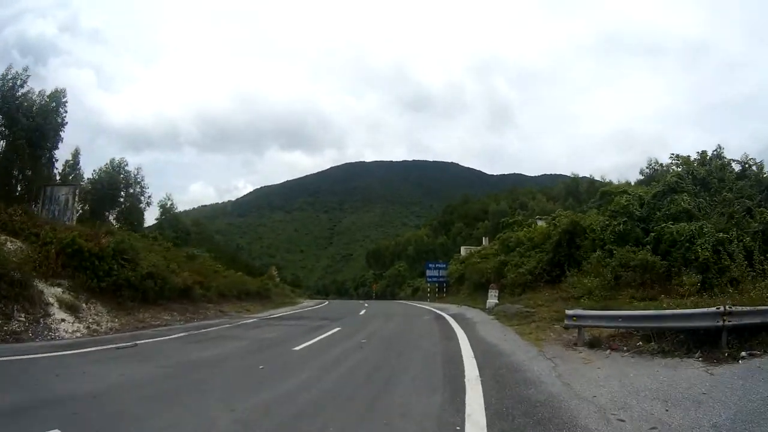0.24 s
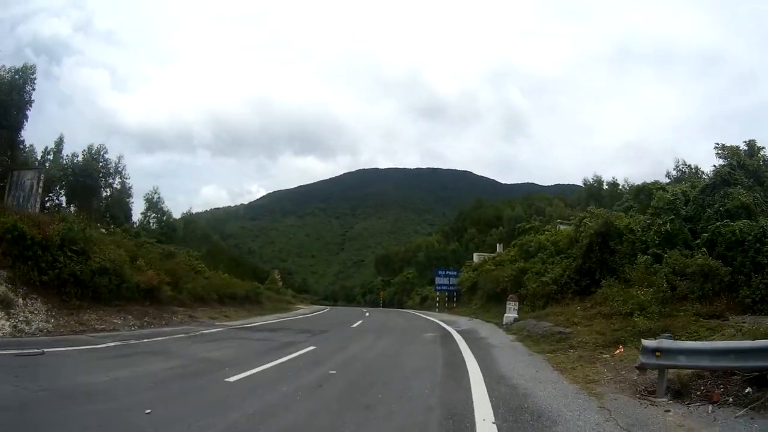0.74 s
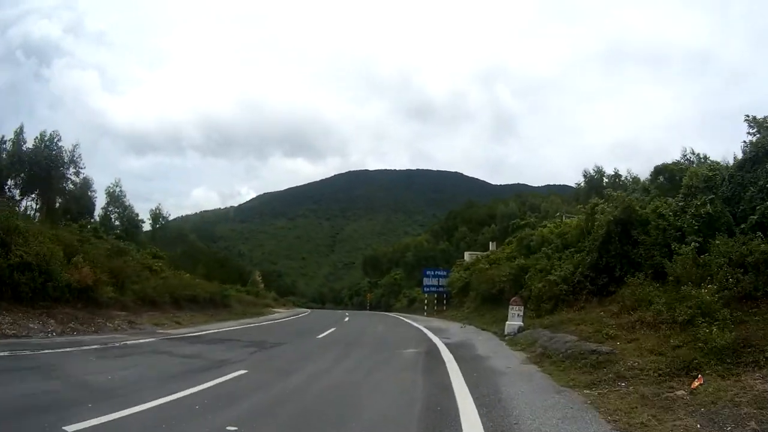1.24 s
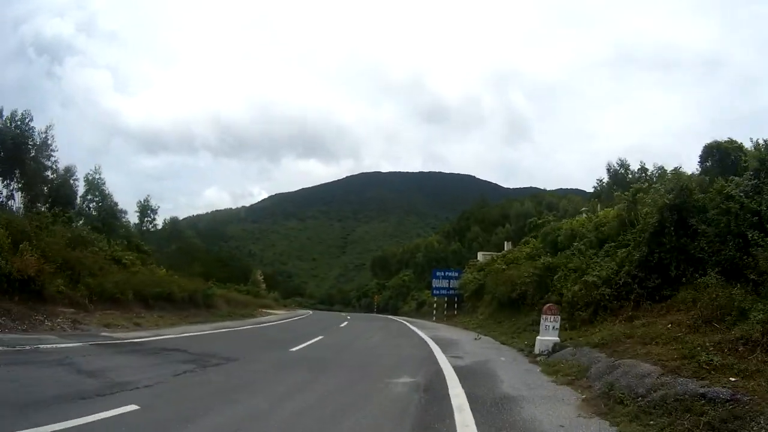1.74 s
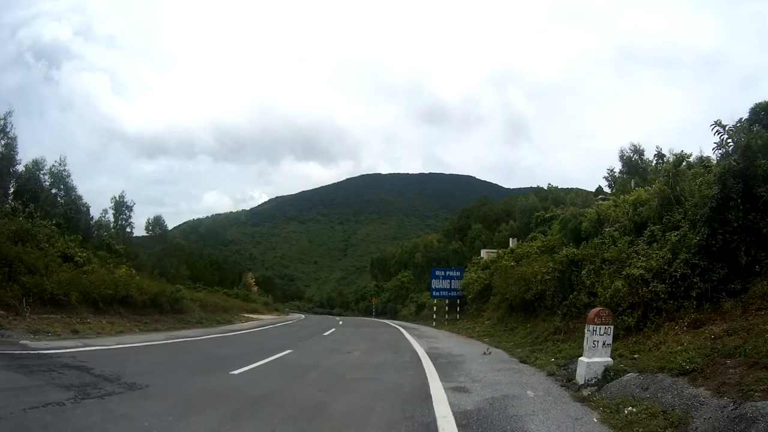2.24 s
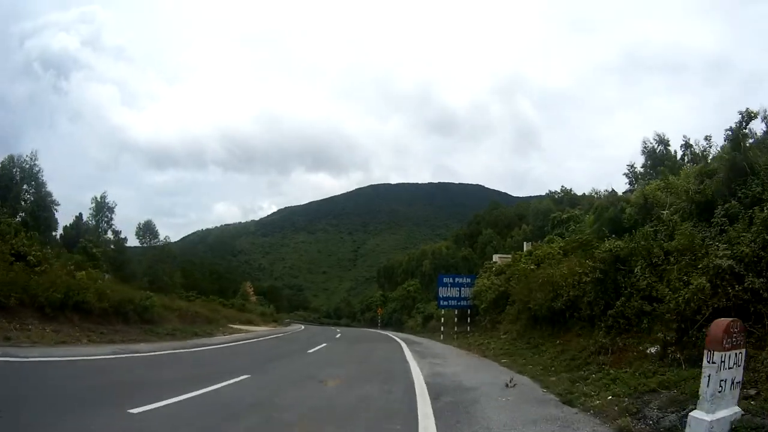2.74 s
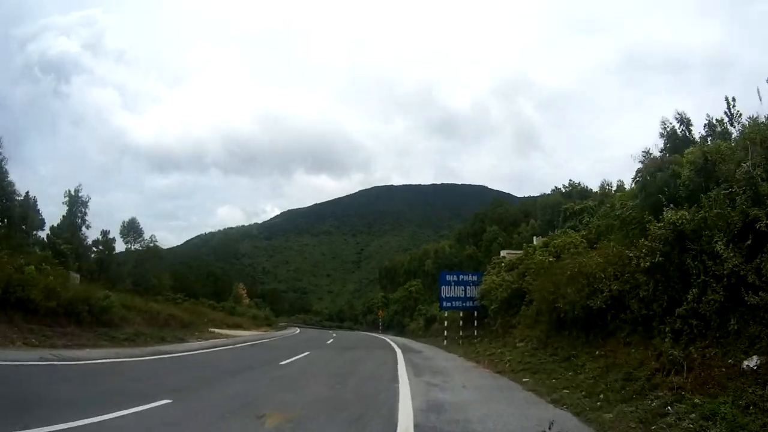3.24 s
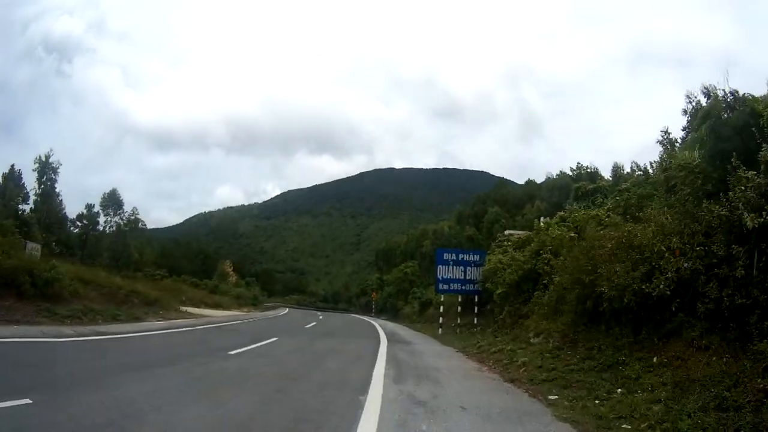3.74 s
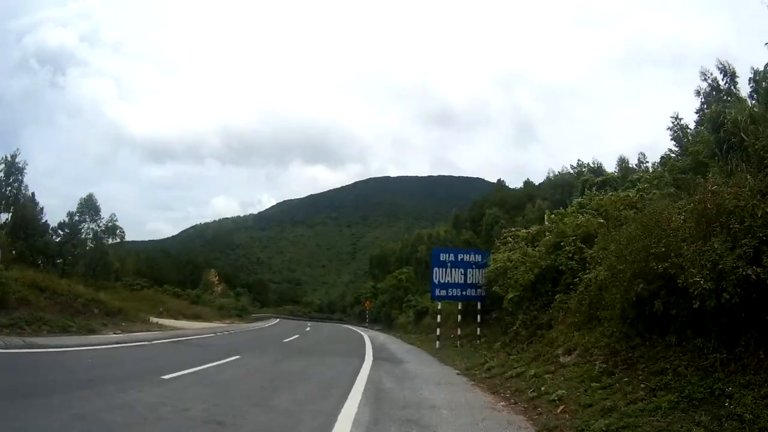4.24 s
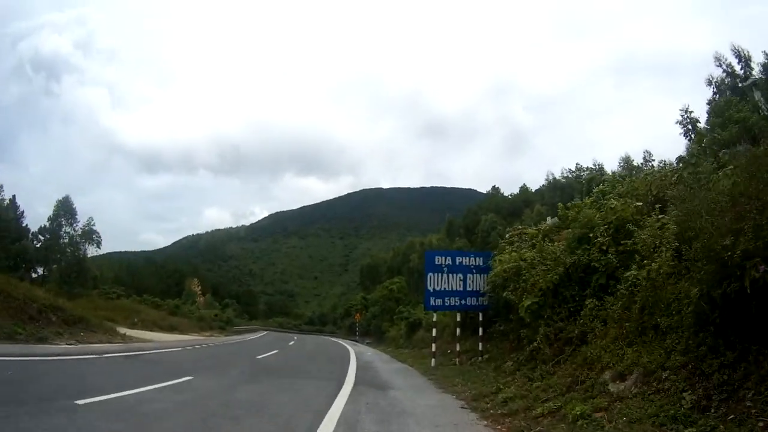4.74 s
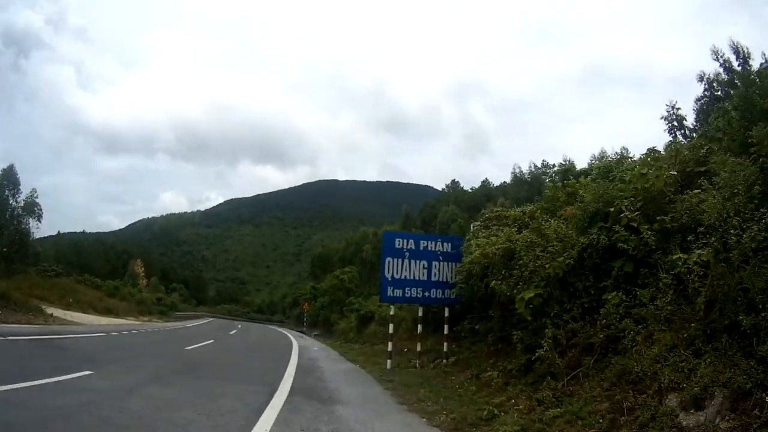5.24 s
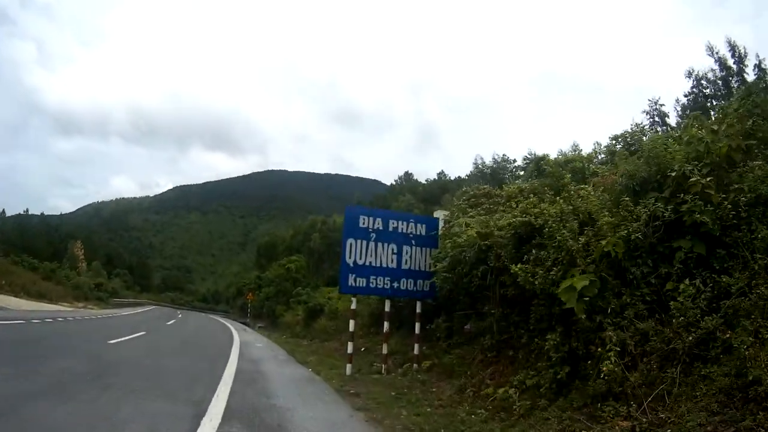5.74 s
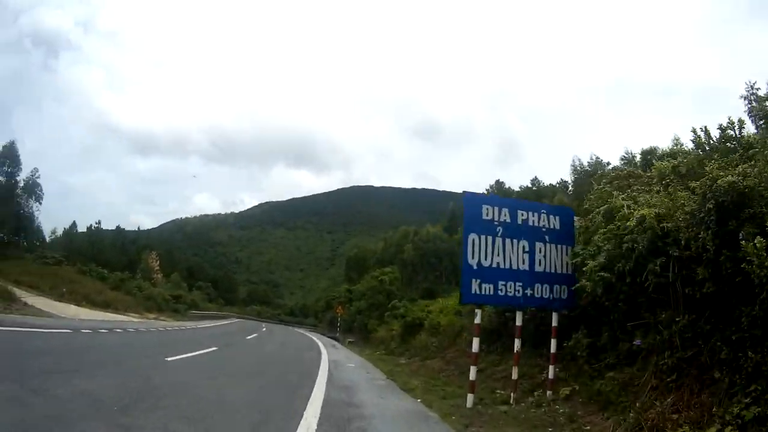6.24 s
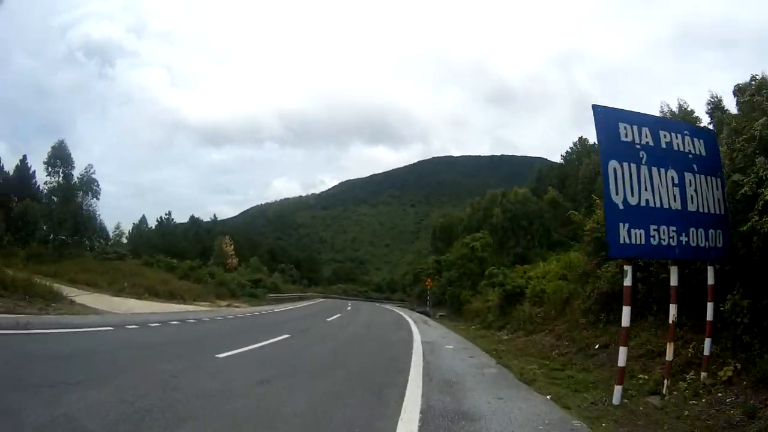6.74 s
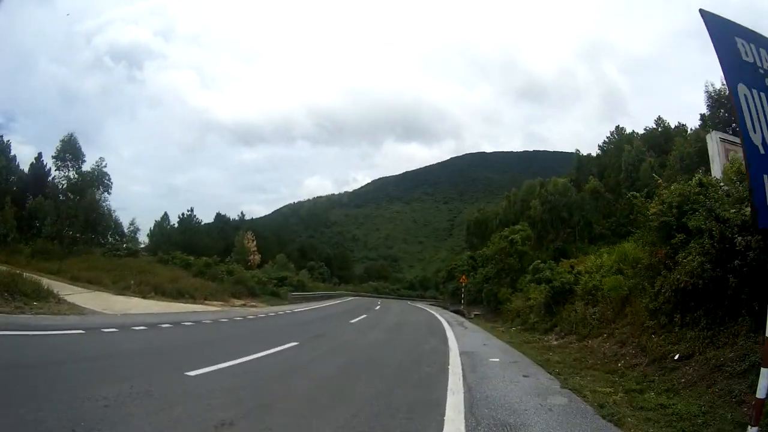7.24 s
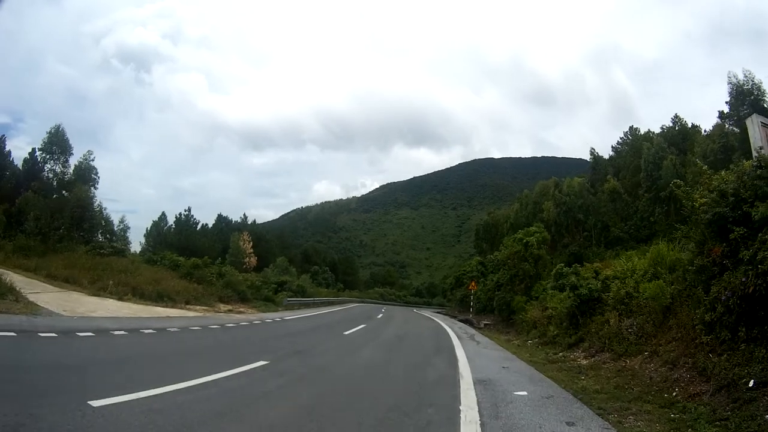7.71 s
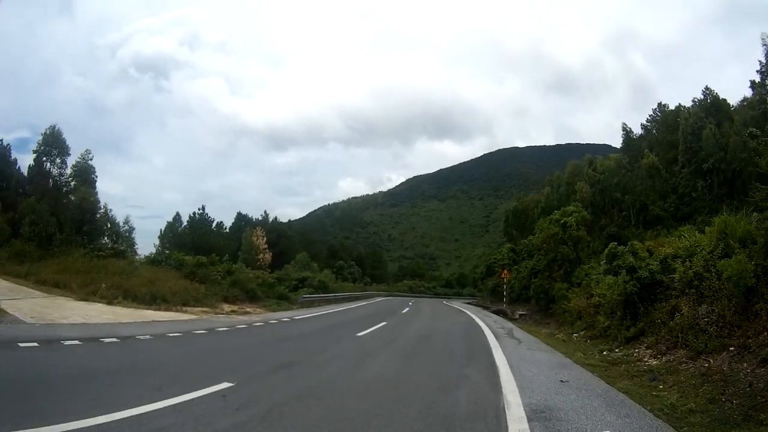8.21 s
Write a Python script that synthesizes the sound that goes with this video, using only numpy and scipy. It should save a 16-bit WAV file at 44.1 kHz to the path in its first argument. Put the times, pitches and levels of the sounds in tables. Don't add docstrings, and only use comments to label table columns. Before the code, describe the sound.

Heard from a muffled microphone mounted on a small motorcycle, a single-cylinder engine thuds rapidly with casing ring, gear whine and tyre roar. Low wind lumps press the housing. After about three seconds the throttle eases, firings slow and become uneven, a fitting tings faintly and a bird trills briefly. A sharp grit crack comes just before the engine picks up and pulls steadily on the open hill road.

```python
import sys
import numpy as np
from scipy import signal
from scipy.fft import rfft, irfft, next_fast_len
from scipy.io import wavfile
from scipy.ndimage import map_coordinates

SR = 44100
rng = np.random.default_rng(int(sys.argv[2]) if len(sys.argv) > 2 else 0)


def decibels_to_gain(level_db):
    exponent = np.asarray(level_db, float) / 20
    return 10 ** exponent


def generate_wav(signal):
    frames = np.transpose(np.atleast_2d(signal))
    scaled = np.clip(frames, -1, 1) * 32767
    pcm = np.round(scaled).astype(np.int16)
    wavfile.write(sys.argv[1], SR, pcm)


N = 373527


def unit(x):
    return x / np.sqrt(np.mean(x ** 2) + 1e-20)


def curves(rows):
    s, *cols = np.transpose(rows)
    return [np.interp(np.arange(N) / SR, s, c) for c in cols]


def swells(rows):
    t = np.arange(N) / SR
    return sum(db * np.exp(-((t - s) / width) ** 2) for s, db, width in rows)


def between(pair, opening):
    shut, cruising = pair
    return shut + (cruising - shut) * opening


def wobble(rate):
    knots = rng.standard_normal(int(N * rate / SR) + 4)
    return map_coordinates(knots, [np.arange(N) * rate / SR])


def filtered(x, response):
    m = next_fast_len(N + SR // 2)
    return irfft(rfft(x, m) * response(np.fft.rfftfreq(m, 1 / SR)), m)[:N]


def sloped(points):
    f, v = np.transpose(points)
    return lambda hz: decibels_to_gain(np.interp(np.log(hz + 1), np.log(f), v, left=-120, right=-120))


def modes(rows):
    def response(f):
        total = 0
        for k, (centre, width, db) in enumerate(rows):
            damping = 1j * f * width
            total = total + (-1) ** k * decibels_to_gain(db) * damping / (centre * centre - f * f + damping)
        return total
    return response


def noise(response, gate=1):
    return unit(filtered(gate * rng.standard_normal(N), response))


def bursts(at, size, hz, spread, shift, lead):
    index = np.round(at).astype(int)[:, None] + np.arange(-1500, 1500)
    t = (index - at[:, None]) / SR
    bell = np.exp(-((t - shift) / spread) ** 2)
    wave = size[:, None] * bell * np.cos(2 * np.pi * hz[:, None] * t + lead)
    keep = (index >= 0) & (index < N)
    return np.bincount(index[keep], wave[keep], N)


# t/s, firings per second
REVS = [(0.0, 21.219), (0.4, 20.679), (1.2, 20.49), (2.4, 19.851), (3.3, 18.828), (3.7, 15.848),
        (3.9, 17.096), (4.2, 15.759), (4.5, 15.967), (5.05, 14.484), (5.75, 14.025), (6.1, 14.472),
        (6.35, 14.279), (6.75, 18.391), (7.2, 20.573), (8.47, 20.643)]
FIRST = .189


def firing_rate():
    return curves(REVS)[0]


# t/s, opening (0 shut, 1 cruising)
THROTTLE = [(0, 0.9), (1.4, .9), (2.2, 1.05), (3.2, 1.16), (3.45, 0.5), (4.85, 0.45), (5.1, 0.52),
            (6.3, 0.039), (6.65, 0.58), (7.05, 1.04), (7.2, 1.12), (7.6, 1.06), (8.47, 1.14)]


def throttle():
    return curves(THROTTLE)[0]


# f/Hz, level/dB per Hz
HISS = [(800, -38), (2000, 2.5), (3200, 2.5), (5000, 1), (7000, -1.8), (10000, -1.8), (14000, -2.2),
        (16500, -8)]


def hiss():
    return decibels_to_gain(-72.5) * noise(sloped(HISS))


# t/s, level/dB
AIR = [(0, -37), (.3, -41), (.6, -38), (1.1, -40.5), (1.4, -37.5), (1.55, -42), (2, -41.5), (2.4, -41.5),
       (2.7, -40.5), (3, -41), (3.5, -44), (4.1, -50.5), (4.7, -46.5), (5.4, -62.5), (7, -56.5), (7.5, -50),
       (8, -51), (8.47, -45.5)]
# t/s, level/dB, half width/s
GUSTS = [
    (.3, 6.5, .15),
    (1.2, 1, 0.22),
    (2.45, 6, 0.33),
    (3.6, 9.5, 0.12),
    (4.05, 7.5, 0.17),
    (4.7, 7, 0.29),
    (5.8, -4, 0.75),
    (7.7, 3, 0.26),
]
# f/Hz, level/dB per Hz
BUFFET = [(15, -27), (32, -5.5), (55, 0), (85, -6.5), (160, -47)]
# f/Hz, level/dB per Hz
FLUTTER = [(40, -23), (90, 4), (200, -0.5), (300, -3), (450, -14.5), (900, -19)]


def wind():
    flutter_db = curves(AIR)[0]
    buffet_db = -56 + 0.19 * (flutter_db - flutter_db.mean()) + swells(GUSTS)
    buffet = noise(sloped(BUFFET), decibels_to_gain(1.2 * wobble(6.1)))
    flutter = noise(sloped(FLUTTER), decibels_to_gain(1.5 * wobble(25) + 1.8 * wobble(5)))
    return decibels_to_gain(buffet_db + 6.5) * buffet + decibels_to_gain(flutter_db + 1.0) * flutter


def bird():
    start_s, gap_s, notes = 4.9545, .0346, 13
    out, t = np.zeros(N + SR), np.arange(int(0.026 * SR)) / SR
    part = t / t[-1]
    luck = rng.standard_normal((notes, 2))
    for k in range(notes):
        shy = k < 2
        pitch_hz = 3410 - 130 * shy + 12 * luck[k, 0] - 340 * part ** 3
        envelope = np.sin(np.pi * part ** 1.7) ** 1.2
        note = envelope * np.sin(2 * np.pi * np.cumsum(pitch_hz) / SR)
        db = -67.5 - 7 * shy + 3.5 * (k / notes) ** 2 + .7 * luck[k, 1]
        out[round((start_s + k * gap_s) * SR):][:len(t)] += decibels_to_gain(db + 1.8) * note
    return out[:N]


# t/s, crack level/dB, ring f/Hz, push level/dB, push f/Hz
GRIT = [
    (.824, -47, 4500, -18.5, 600),
    (1.973, -47, 5100, -42, 900),
    (3.4395, -70, 3000, -19, 240),
    (3.853, -68, 2500, -25, 1150),
    (4.889, -64, 2600, -27, 900),
    (6.461, -33.5, 10800, -25, 600),
    (7.2625, -48, 10200, -55, 700),
    (7.831, -52, 6100, -45, 900),
]


def grit():
    out, t = np.zeros(N + SR), np.arange(2000) / SR
    for s, db, hz, push_db, push_hz in GRIT:
        crack = np.sin(2 * np.pi * hz * t) * decibels_to_gain(-60 * t / .004)
        crack += .33 * rng.standard_normal(len(t)) * decibels_to_gain(-60 * t / .005)
        crack *= 1 - np.exp(-t / .0004)
        push = np.sin(2 * np.pi * push_hz * t) * decibels_to_gain(push_db - 60 * t / .008)
        push *= 1 - np.exp(-t / .0003)
        out[round(s * SR):][:len(t)] += decibels_to_gain(db) * crack + push
    return out[:N]


# t/s, peak level/dB, f/Hz
TINGS = [(3.62, -74, 4700), (4.35, -72, 4700), (4.79, -70, 4680), (5.0, -71, 4750), (5.24, -73, 4680),
         (5.475, -70, 4620), (5.685, -71, 4680)]


def loose_fitting():
    out, t = np.zeros(N + SR), np.arange(2000) / SR
    for s, db, hz in TINGS:
        envelope = decibels_to_gain(db + 7.5 - 60 * t / .06) * (1 - np.exp(-t / .004))
        out[round(s * SR):][:len(t)] += envelope * np.sin(2 * np.pi * hz * t)
    return out[:N]


TEETH = [23, 32.6, 41]
# level/dB throttle shut, level/dB cruising
MESH_LEVEL = [(-65.5, -65), (-71, -56), (-85, -61.5)]
# t/s, level/dB, half width/s
PULLS = [
    (0, 19, 0.15),
    (7.3, 20, 0.75),
]
# t/s, level/dB, half width/s
CLIMB = [
    (2.6, 5, 1),
]


def gears(cycle):
    tones, opening = 0, throttle()
    for teeth, pair, load in zip(TEETH, MESH_LEVEL, (PULLS, CLIMB, CLIMB)):
        db = between(pair, opening) + swells(load)
        level = decibels_to_gain(db + 2.5 + 1.9 * wobble(12))
        tones = tones + level * np.sin(2 * np.pi * teeth * cycle + 1.15 * wobble(22))
    return tones


# f/Hz, width/Hz, level/dB
CASING = [(645.5, 55.5, -0.5), (828, 30, -3), (1106, 102, -3.5), (1305.4, 55, -2), (1637, 193, -13),
          (2427, 180, -26.5)]
# f/Hz, width/Hz, level/dB
FRAME = [(310, 80, -11), (465, 65, 0), (900, 80, -9)]
# f/Hz, width/Hz, level/dB
PANELS = [(3330, 150, -6), (3820, 190, 0), (4260, 160, -3), (5270, 220, -1), (5900, 500, -13)]
# f/Hz, level/dB per Hz
ROAR = [(150, -13), (300, 0.5), (550, -6), (750, -13.5), (1000, -6.5), (1350, -14.5), (1500, -12),
        (1800, -15.5), (2100, -36), (2600, -29.5), (3000, -43), (4000, -62)]
# f/Hz, level/dB
MUFFLE = [(120, -34), (280, -2), (1400, -2), (2600, -4), (3300, -19), (6000, -43)]
# t/s, level/dB, half width/s
BUMPS = [
    (.5, 5, 0.24),
    (1.3, 6, .15),
    (2.1, 4, 0.63),
    (3.2, -1, .3),
    (5.3, 2, 0.52),
    (7.25, 2.5, 0.093),
    (8.35, 4.5, 0.36),
]


def machinery(cycle, knock):
    opening, rate, bumps_db = throttle(), firing_rate(), swells(BUMPS)
    cruise_per_s = 20.5
    casing_db = between((-49, -45), opening) + 0.52 * (rate - cruise_per_s)
    frame_db = between((-48, -48), opening) + 0.57 * bumps_db
    rattle_db = between((-91, -77), opening) + bumps_db

    def swell(db, at):
        return decibels_to_gain(db * np.cos(2 * np.pi * (cycle - at)))

    def dull(rows):
        return lambda f: modes(rows)(f) * sloped(MUFFLE)(f)

    def panel_band(f):
        return modes(PANELS)(f) * (f > 2900) * (f < 6600)

    beat_db = .1 + .2 * (cruise_per_s + .7 - rate)
    jolts = decibels_to_gain(1.23 * wobble(22) + 0.74 * wobble(70))
    casing = decibels_to_gain(-2.5) * noise(dull(CASING), swell(beat_db, 0.18) * decibels_to_gain(1.47 * wobble(30)))
    casing += noise(sloped(ROAR), swell(beat_db, 0.026) * jolts)
    casing += decibels_to_gain(-11) * unit(filtered(knock, dull(CASING)))
    frame = noise(dull(FRAME), swell(beat_db, 0.16))
    valves = swell(2.3, 0.21) * decibels_to_gain(2.5 * np.cos(6 * np.pi * cycle + .3))
    rattle = noise(panel_band, valves * jolts ** 1.1)
    return decibels_to_gain(casing_db + 0.46) * casing + decibels_to_gain(frame_db - 1.0) * frame + decibels_to_gain(rattle_db - 1.5) * rattle


# t/s, level/dB, half width/s
STUMBLES = [
    (1.2, -2.5, .12),
    (2.9, -5, 0.13),
    (3.43, -5.5, .06),
    (4.3, -2, 0.081),
    (5.0, -5.5, 0.1),
    (5.19, -2, 0.034),
    (5.39, -9.5, 0.08),
    (6.04, -7, .07),
    (6.65, 2, .15),
]


def exhaust(cycle):
    number = np.arange(0, int(cycle[-1]) + 1)
    at = np.searchsorted(cycle, number).astype(float)
    at[0] -= FIRST * SR / REVS[0][1]
    i = np.clip(at, 0, N - 1).astype(int)
    opening, rate = throttle()[i], firing_rate()[i]
    level = between((-33.5, -28.5), opening) + swells(STUMBLES)[i]
    hz = between((102.3, 121.1), opening)
    gulp_db = between((3, -15), opening)
    lag = between((0.214, 0.1866), opening) / rate * SR
    since = i / SR - 3.45
    limp_ms = 1.7 * np.exp(-np.abs(since) / np.where(since > 0, 1.2, .1))
    luck = rng.standard_normal((len(at), 3))
    late = (limp_ms * (2 * (number % 2) - 1) + 0.11 * luck[:, 0]) * SR / 1000

    blow_size = decibels_to_gain(level + 2.0 + 0.78 * luck[:, 1])
    blow = bursts(at + late, blow_size, hz, spread=0.0075, shift=0.0017, lead=0.012)
    gulp_size = decibels_to_gain(level + 1.6 + gulp_db + 1.7 * luck[:, 2])
    gulp = bursts(at + lag, gulp_size, 1.19 * hz, spread=0.0055, shift=0.00027, lead=0.039)
    snap_size = decibels_to_gain(level - 17 + 8 * limp_ms + gulp_db + 2 * luck[:, 2])
    snap = bursts(at + lag, snap_size, 2.6 * hz, spread=.0022, shift=.0003, lead=.05)
    knock = np.bincount(np.minimum(i + 420, N - 1), decibels_to_gain(0.4 * luck[:, 1]), N)
    return blow + gulp + snap, knock


def scene():
    cycle = FIRST + np.cumsum(firing_rate()) / SR
    beat, knock = exhaust(cycle)
    surroundings = wind() + bird() + grit() + loose_fitting()
    return (surroundings + gears(cycle) + machinery(cycle, knock) + beat)[None]


def band_limit(x):
    return signal.sosfilt(signal.butter(12, 15720, fs=SR, output="sos"), x)


def record(dry):
    heard = filtered(dry[0], lambda hz: hz < 15700)[None]
    mix = heard + hiss()
    return band_limit(mix)


dry = scene()
out = record(dry)
generate_wav(out)
```